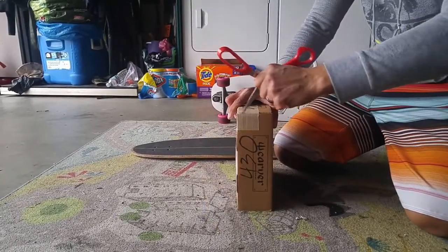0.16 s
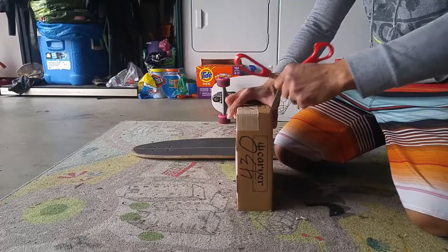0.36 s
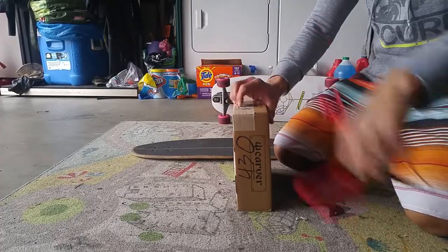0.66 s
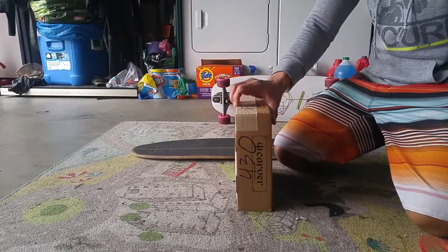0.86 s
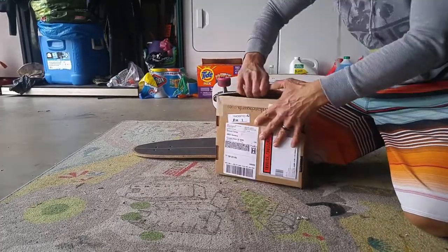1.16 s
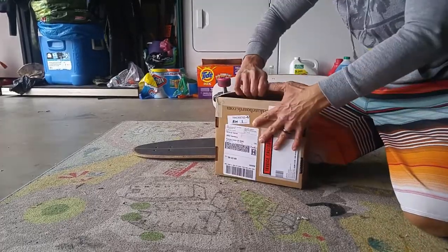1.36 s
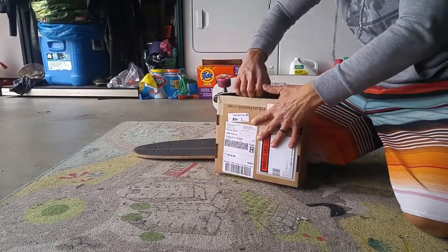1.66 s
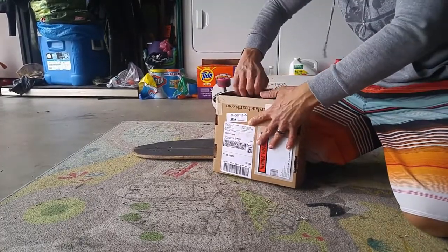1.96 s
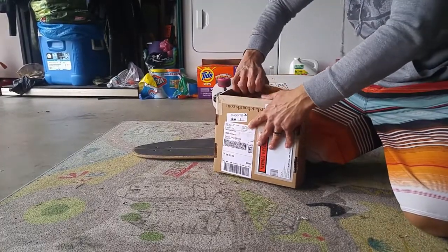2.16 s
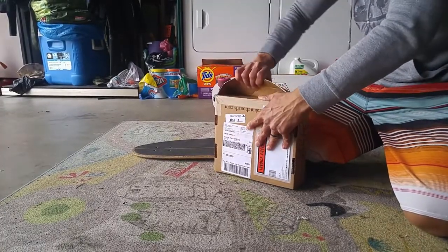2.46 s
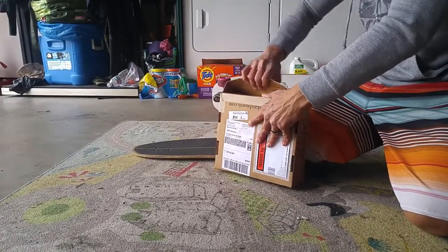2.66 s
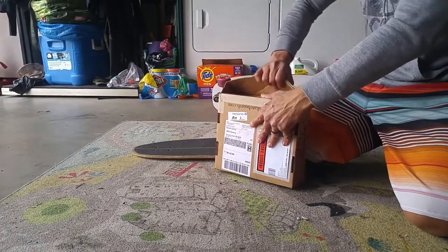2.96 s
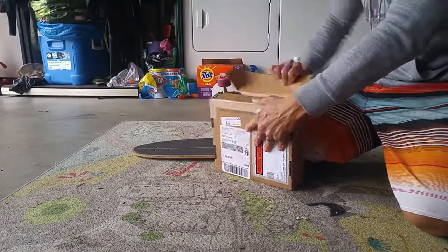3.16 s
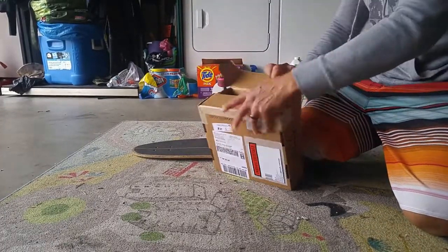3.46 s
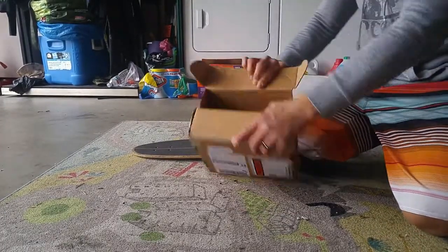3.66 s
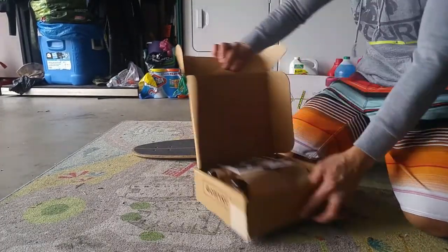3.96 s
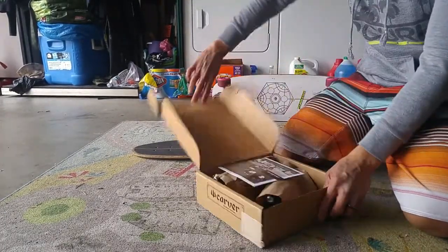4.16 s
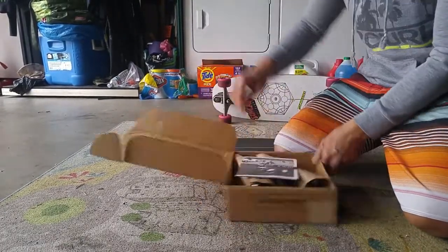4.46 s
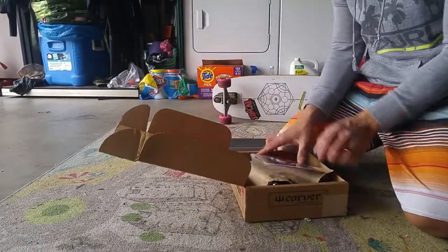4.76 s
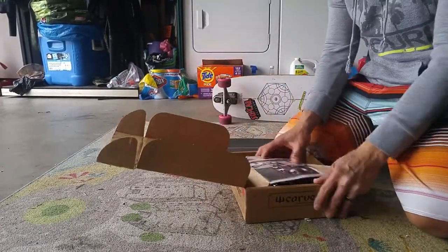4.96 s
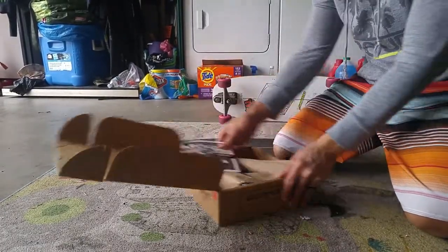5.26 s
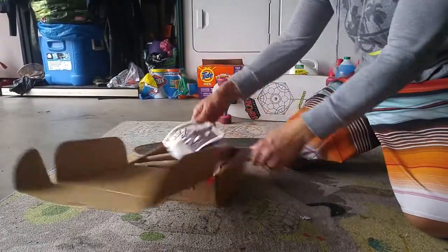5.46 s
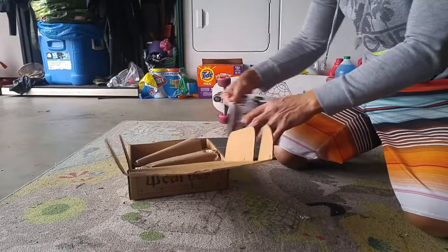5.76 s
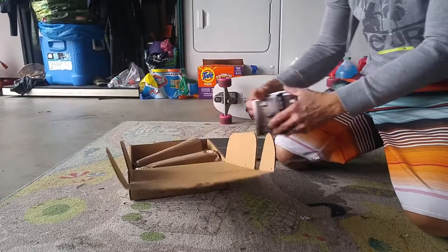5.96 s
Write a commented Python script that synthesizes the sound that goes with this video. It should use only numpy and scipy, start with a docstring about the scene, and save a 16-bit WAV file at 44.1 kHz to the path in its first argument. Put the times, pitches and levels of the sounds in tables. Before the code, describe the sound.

Scissors slit tape on a small cardboard box and clatter onto concrete, then tabs pop loose, the lid creaks open, and paper rustles.

```python
"""Opening a cardboard box

A cardboard box is opened on a rug in a garage: scissors slit the tape and clatter onto the concrete at the left,
fingers pry the tabs loose, the lid creaks open, the box slides on the rug and paper rustles.
Rubbing and knocks ring the parts of the hollow box, while its surface hisses and cracks. Bounces ring the blades.
Gliding tones are the creaks, filtered noise is the garage air. Two close microphones hear it in a short room."""
import sys
import numpy as np
from scipy import signal
from scipy.fft import rfft, irfft, next_fast_len
from scipy.io import wavfile

SR = 44100
rng = np.random.default_rng(int(sys.argv[2]) if len(sys.argv) > 2 else 0)


def master_out(mix):
    """Clip the mix to full scale and print it as 16-bit PCM to the path in sys.argv[1]."""
    frames = np.transpose(np.atleast_2d(mix))
    ceiling = np.clip(frames, -1, 1)
    pcm = np.round(ceiling * 32767).astype(np.int16)
    wavfile.write(sys.argv[1], SR, pcm)


N = 269451


def from_db(db):
    """Gain of a level in dB."""
    return 10 ** (np.asarray(db) / 20)


def rms_one(x):
    """Scale to an average strength (rms) of 1."""
    return x / np.sqrt(np.mean(x ** 2) + 1e-20)


def in_time(rows):
    """Join the rows of a table into curves over all samples, one per column after the time."""
    s, *columns = np.transpose(rows)
    return [np.interp(np.arange(N) / SR, s, column) for column in columns]


def at_hz(points, size):
    """Read a table of (f/Hz, value) at every FFT bin, along a logarithmic pitch scale."""
    hz = np.maximum(np.arange(size // 2 + 1) * SR / size, 1)
    table_hz, values = np.array(points).T
    return np.interp(np.log(hz), np.log(table_hz), values)


def colour(x, spectrum):
    """Filter to the shape of a spectrum; white noise of rms 1 keeps rms 1."""
    size = next_fast_len(N + SR // 10)
    gain = from_db(at_hz(spectrum, size))
    return irfft(rfft(x, size) * rms_one(gain), size)[..., :N]


# Colour of the garage air: f/Hz, relative level per Hz/dB
GARAGE = [(15, -50.5), (25, -16.5), (44, -4.5), (123, -1), (276, -11.5), (710, -12.5), (1090, -26.5),
          (1510, -25), (2460, -35.5), (3130, -26), (3390, -37), (8730, -30), (15800, -48)]
GARAGE_DB = -57


def garage_air():
    """The steady air of the garage is noise, strongest in the bass."""
    return from_db(GARAGE_DB) * colour(rng.standard_normal(N), GARAGE)


def ring(force, hz, t60):
    """A resonance: a unit click sets a sine of height 1 ringing, which falls 60 dB in t60 seconds."""
    r = from_db(-60 / (t60 * SR))
    w = 2 * np.pi * hz / SR
    return signal.lfilter([0, np.sin(w)], [1, -2 * r * np.cos(w), r * r], force + 1e-18)


def grains(per_s, spread_db, smooth):
    """Friction: fibres catch and let go at random, mixed with a share of smooth noise; rms near 1."""
    sizes = from_db(spread_db * np.minimum(rng.exponential(1, N), 5)) * rng.choice([-1, 1], N)
    catches = rms_one(sizes * (rng.random(N) < per_s / SR))
    share = np.clip(smooth, 0, 1)
    return np.sqrt(1 - share) * catches + np.sqrt(share) * rng.standard_normal(N)


def jolts(times, levels_db, length_s):
    """Strength of short impacts: jumps up at each time and fades by a factor e in the given length."""
    clicks = np.zeros(N)
    clicks[np.round(np.asarray(times) * SR).astype(int)] = from_db(levels_db)
    return signal.lfilter([1], [1, -np.exp(-1 / (length_s * SR))], clicks + 1e-18)


def drift(rate_hz):
    """Slow random wandering of spread 1: noise at every 40th sample through two equal low-passes."""
    r = np.exp(-80 * np.pi * rate_hz / SR)
    noise = rng.standard_normal(N // 40 + 2002)
    slow = signal.lfilter([1], [1, -2 * r, r * r], noise)[2000:]  # skip the start-up
    return np.interp(np.arange(N) / 40, np.arange(len(slow)), rms_one(slow))


def board(modes, knock_s, rub_db, knock_db, per_s, length_s, knock_gain_db, grip_db):
    """One part of the box rings when rubbed or knocked; soft contact cannot drive it far above its top mode."""
    rub = grains(per_s, spread_db=2.5, smooth=0.57)
    signs = [(-1) ** k for k in range(len(modes))]
    plain = sum(sign * from_db(db) * ring(rub, hz, t60) for sign, (hz, db, t60) in zip(signs, modes))
    rub = rub / np.std(plain)
    rattle = jolts(knock_s, knock_db + knock_gain_db, length_s)
    impact = jolts(knock_s, knock_db + knock_gain_db + 2.5, 0.00013)
    out = 0
    for sign, (hz, db, t60) in zip(signs, modes):
        # where grip_db is not zero, the moving grip frees now one mode, now another
        stroke = from_db(rub_db + grip_db * drift(24.0)) * rub
        # a sharp shared impact, and a rattle of its own for every mode
        force = stroke + impact + rattle * rng.standard_normal(N)
        out = out + sign * from_db(db) * ring(force, hz, t60)
    soft = signal.butter(2, 1.245 * modes[-1][0], fs=SR, output="sos")
    return signal.sosfilt(soft, out)


# Colour of rubbed and cracking fibres: f/Hz, relative level per Hz/dB
HISS = [(1290, -8.5), (2200, -4.5), (4290, -6.5), (4940, -6), (6380, -8), (7280, -7), (7900, -9.5),
        (9550, -2), (12300, -14.5), (14800, -19.5), (15800, -16)]
GRAIN_SPLIT_HZ = 5800  # coarse fibres sound below, fine ones above


def surface(knock_s, hiss_db, crack_db, band, per_s):
    """Paper fibres hiss under the hand and crack at each knock."""
    force = from_db(hiss_db) * grains(per_s, spread_db=5.5, smooth=0.71)
    force += jolts(knock_s, crack_db + 3.5, 0.003) * rng.standard_normal(N)
    split = signal.butter(3, GRAIN_SPLIT_HZ, band, fs=SR, output="sos")
    return signal.sosfilt(split, colour(force, HISS))


SHUDDER_DB, SHUDDER_S = -20.5, 0.031  # strength against the knock, fading time


def with_shudder(knock_s, rub_db, knock_db):
    """After a knock the board goes on rubbing briefly: add this dying shudder to the rubbing level."""
    shudder = jolts(knock_s, knock_db + SHUDDER_DB, SHUDDER_S)
    return 10 * np.log10(from_db(rub_db) ** 2 + shudder ** 2)


# Gestures of the hands, one curve each:
# t/s, relative level of pressure (sound of the board)/dB, relative level of sliding speed (hiss)/dB
STROKES = [
    [(0.0, -81, -93), (0.086, -72, -85), (0.096, -40, -54.5), (0.172, -44, -58.5), (0.194, -55, -76),
     (0.205, -53, -68)],
    [(0.205, -47, -64), (0.211, -26.5, -44), (0.229, -29.5, -41.5), (0.289, -29, -37.5),
     (0.341, -24, -32.5), (0.63, -69.5, -70.5)],
    [(0.63, -66, -71), (0.678, -31, -49), (0.728, -77, -67), (0.796, -50.5, -63), (0.828, -74, -67),
     (0.95, -58, -87)],
    [(1.15, -38, -52.5), (1.246, -49.5, -56), (1.272, -59, -76), (1.298, -39, -48.5), (1.408, -59, -71.5),
     (1.495, -43.5, -56.5)],
    [(1.495, -41, -55), (1.595, -50.5, -59), (1.621, -50, -61), (1.807, -48, -62), (1.823, -47, -78),
     (1.87, -67, -71)],
    [(1.87, -62, -79), (1.906, -41, -51.5), (2.036, -38, -55), (2.044, -32.5, -49.5), (2.186, -53.5, -69),
     (2.214, -40.5, -54)],
    [(2.214, -30, -54), (2.222, -27.5, -54), (2.238, -32, -56.5), (2.296, -36, -53.5), (2.314, -51, -69),
     (2.324, -28, -28)],
    [(2.324, -15, -36), (2.332, -8.5, -29), (2.378, -28, -37.5), (2.386, -20, -40), (2.446, -59, -56),
     (2.455, -10, -52)],
    [(2.455, -27, -31), (2.461, -24, -37), (2.475, -33, -46), (2.481, -32, -45), (2.561, -53, -66),
     (2.63, -38, -57.5)],
    [(2.63, -46, -61), (2.67, -38, -50), (2.794, -51, -60.5), (2.848, -46, -50), (2.86, -41.5, -46.5),
     (2.945, -44, -56.5)],
    [(2.945, -38, -60), (2.957, -25, -57), (2.967, -32, -55), (2.975, -21, -41), (2.997, -19.5, -39),
     (3.11, -28, -42)],
    [(3.11, -32, -46), (3.124, -21, -34.5), (3.168, -17, -32.5), (3.238, -36.5, -41.5), (3.258, -22, -36),
     (3.3, -48, -45)],
    [(3.3, -38, -52), (3.37, -32.5, -47), (3.404, -39, -55.5), (3.522, -27, -45.5), (3.542, -35, -49.5),
     (3.63, -40, -55.5)],
    [(3.63, -45.5, -62), (3.71, -28.5, -34.5), (3.756, -20, -30.5), (3.854, -24, -37), (3.868, -22, -31.5),
     (3.9, -28, -45)],
    [(3.9, -34, -39.5), (3.966, -24, -39.5), (3.998, -32.5, -41.5), (4.082, -28.5, -35.5),
     (4.094, -26, -30.5), (4.18, -31.5, -44)],
    [(4.18, -37, -45), (4.276, -41.5, -50), (4.478, -37, -43), (4.55, -33, -46.5), (4.56, -40, -44),
     (4.6, -32, -47)],
    [(4.6, -27, -41), (4.618, -22.5, -36.5), (4.7, -46, -46.5), (4.714, -36, -53), (4.728, -37, -39.5),
     (4.8, -43.5, -48)],
    [(4.8, -43, -51), (4.814, -46, -56), (4.826, -32, -45), (4.86, -42.5, -53), (4.994, -29, -41.5),
     (5.03, -47, -47)],
    [(5.03, -31.5, -40.5), (5.108, -33.5, -44), (5.144, -43.5, -44), (5.192, -31, -32.5),
     (5.284, -36, -40.5), (5.29, -24, -32)],
    [(5.29, -23.5, -37), (5.336, -26.5, -41), (5.35, -22, -28), (5.404, -36, -44), (5.63, -50.5, -47),
     (5.651, -50, -43)],
    [(5.651, -23.5, -42), (5.657, -28.5, -44), (5.671, -34, -49), (5.689, -34.5, -43.5), (5.821, -50, -59),
     (5.83, -57, -56)],
    [(5.83, -57, -61), (5.846, -59, -49), (5.852, -46, -52.5), (6.022, -51, -63), (6.04, -46, -49.5),
     (6.11, -66, -72)],
]
# Where each gesture holds the box: relative level of bottom/dB, walls/dB, flaps/dB, edges/dB
# over pressure, then level of fine over coarse fibres/dB
GRIPS = [(-26, -1, -9, -10, 8), (-34, 1.5, -4, -9, 1), (-25, -6, 2, -6.5, 2), (-8, 2.5, -4, -5.5, -0.5),
         (-2, 1, -4.5, -6, 1), (-10, -2, -8, -9.5, 0), (-12, -8, -9, -14, -3), (-15, -5.5, -17, -9, -6),
         (-10, 0.5, -8, -10, -1), (-16, 1, -2.5, -7.5, 2.5), (3, -10, -5, -9, -0.5),
         (-18, -7, -2.5, -9, -2), (-8, -7.5, -5.5, -12, -1), (-20, -1, -3.5, -5.5, -4.5),
         (-10, -0.5, -3, -6.5, -5.5), (-12, -6.5, 0, -7.5, -4.5), (-14, -2, 0, -9, -3.5),
         (-16, -5.5, -2, -17, -6.5), (-13, -3, -2.5, -9.5, -1.5), (-14, -4.5, -1.5, -3, -5),
         (-14, -4.5, -1.5, -6, -5), (-3, -5, -6, -5, -6)]
# Knocks and snaps rung through the box parts (those at 1.007 and 1.029 s come as the scissors land): # t/s,
# relative level/dB, then relative to that level: # weight/dB (bottom), hollowness/dB (walls), hardness/dB
# (edges), crack/dB (fine fibres)
KNOCKS = [(0.095, -45.5, -16, 1, -7, -13), (0.139, -42.5, -17, 0, -8, -6),
          (0.163, -34, -16, -5, -15, -11.5), (0.214, -36, -20, 10.5, -16, -14.5),
          (0.231, -25, -21, 2, -13, -19), (0.332, -25.5, -14, -4.5, 3.5, 5),
          (0.349, -25.5, -23, -4, -4, 1.5), (0.374, -30, -18, -5, -3, -7), (0.446, -23, -37, -14, -12, -11),
          (0.669, -28, -21, -16, -4.5, -42), (1.007, -30, -29, -33, -7, 0), (1.029, -32, -20, -13, -3, 10),
          (1.232, -43.5, -6, 3, 2.5, -22), (1.288, -36.5, -13, -8, -4, -7),
          (1.496, -33, -11, 2.5, 3.5, -21), (1.819, -34, -21, -7.5, -7.5, -42),
          (1.894, -41.5, -22, -9, -3, -2), (1.904, -37, -21, -3, -4, -5), (1.924, -34, -11, -7, -5, -4),
          (1.95, -39.5, -16, -2, 5, 0.5), (1.977, -35.5, -13, -2, 11, 0.5), (2.044, -37, -6, 11, 4.5, -6),
          (2.087, -46.5, -3, -5, -2, -3), (2.216, -27.5, -22, 1.5, 5.5, -40), (2.289, -54.5, 8, 3, 12.5, 3),
          (2.326, -4, -16, -8, -7, -16.5), (2.35, -25.5, -19, -0.5, 10, -16),
          (2.386, -24, -21, 0.5, 3.5, -11), (2.458, -24, -15, 6, 10, -20), (2.483, -31.5, -7, -11, 9.5, -9),
          (2.673, -38, -18, 0, -4, -2), (2.817, -42, 3.5, -1, 2, -1.5), (2.842, -34, -15, -4, 5, -4.5),
          (2.954, -32, 3.5, 5, -1.5, -31), (2.973, -25.5, 4.5, 5.5, 5.5, -20),
          (2.988, -22, -11, -1, -3, -9), (3.003, -17.5, -7, 0.5, 1.5, -25),
          (3.041, -23.5, -16, -4, 0.5, -6), (3.058, -23.5, -10, -8, 3, -11), (3.075, -30, -5, -19, 0, -16),
          (3.093, -23.5, -5, -6, -2, -12), (3.129, -19.5, -6, 3, 3.5, -11.5),
          (3.159, -11.5, -9.5, 2, -6, -13), (3.174, -20, -14, 3.5, -26, -6),
          (3.256, -21, -33, -25, -3, -19), (3.31, -30, -21, 3, -7, -25), (3.36, -25, -19.5, 4, -22, -26),
          (3.419, -39.5, -16, 8.5, -13, -21), (3.507, -27.5, -5.5, -8, 0, -21),
          (3.546, -25, -14, 7, -16, -32), (3.863, -14.5, -22, -1, -13, -34),
          (3.917, -22.5, -7, 1.5, -10, -27), (3.934, -22, -5, -7, -3, -17.5),
          (3.952, -7, -19, -6, -20, -27.5), (3.968, -10, -26, -8.5, -24, -32),
          (3.988, -30, -15, -4, -20, -6), (4.016, -21, -7.5, -2.5, -8, -23),
          (4.049, -23.5, -4.5, 1, -1, -27), (4.091, -12, -18, -7.5, -7, -23),
          (4.118, -28.5, -11, 2, 2, -15), (4.612, -19.5, -19, -6, -16, -27),
          (4.652, -22, -23, -5, -22, -12), (4.728, -37, -22, -8, 2.5, -17),
          (4.823, -20.5, -30, -29, -23, -38), (4.889, -23.5, -22, -9, -9, -23),
          (4.942, -35.5, -13, -3, -0.5, -11), (4.972, -27, -13, -7, -2, -14.5),
          (4.992, -24, -23, -4.5, -10.5, -21), (5.014, -35, -21, -8, -1.5, -12),
          (5.064, -28, -28, -8, -11, -12), (5.107, -36.5, -18, 5, -18, -11),
          (5.195, -21, -18.5, -19, -8, -7.5), (5.292, -15, -20, -3.5, 2.5, -33),
          (5.349, -21.5, -24, -27, 7, -18), (5.45, -26.5, -18, -13, -5.5, -13.5),
          (5.518, -26.5, -27, -26, -11, -28), (5.636, -37, -28, -9, -6, -5),
          (5.653, -15.5, -31, -16, -15, -27), (5.773, -44, -11, -14, 7, -5),
          (5.796, -40.5, -4, -0.5, 4.5, -4), (5.842, -41, -14, -11, -19, 4), (5.854, -38, -7, -11, -8, -17),
          (5.897, -39, -4, -6.5, 1.5, -8), (5.98, -35.5, -24, -12, -7, -27), (6.025, -47, -1, 4, 3.5, -14),
          (6.044, -47, -1, -12, 0, -14)]
# Ringing tones of the box, from its large bottom to its small edges: f/Hz, relative level/dB, t60/s
BOTTOM = [(58.5, -12.5, 0.11), (78.4, -6, 0.073), (109.4, -2, 0.11), (132, 1.5, 0.033),
          (160.7, -0.5, 0.092), (190.3, 1.5, 0.083)]
WALLS = [(205.3, -2, 0.033), (264.4, -0.5, 0.065), (295, -5.5, 0.08), (339.3, 3, 0.064), (379, 3.5, 0.074),
         (447.6, 2.5, 0.063)]
FLAPS = [(611.6, -3, 0.038), (702.7, 2, 0.028), (778.4, -2, 0.039), (855, -3, 0.037), (918, -5, 0.036),
         (998, -12, 0.073)]
EDGES = [(1097, -2, 0.022), (1200, -6.5, 0.041), (1263, -2.5, 0.02), (1552, 3, 0.011), (1824, -6.5, 0.024),
         (1950, -10.5, 0.026), (2194, -5.5, 0.012), (2450, -13, 0.023), (2774, -14.5, 0.022)]
HANDS_OFF_S = (.95, 1.15)  # the hands stop rubbing while the scissors are dropped
SNAP_HARDNESS, SNAP_DB = 0.6, -3.5  # the coarse snap lies between hardness and crack


def box():
    """The hollow box: large parts boom, small ones tick, the surface hisses and cracks."""
    rows = [row + grip for stroke, grip in zip(STROKES, GRIPS) for row in map(tuple, stroke)]
    press_db, speed_db, to_bottom, to_walls, to_flaps, to_edges, fineness = in_time(rows)
    t = np.arange(N) / SR
    rest_db = -60 * ((t > HANDS_OFF_S[0]) & (t < HANDS_OFF_S[1]))
    press_db, speed_db = press_db + rest_db, speed_db + rest_db

    knock_s, flap_db, weight, hollow, hard, crack = np.transpose(KNOCKS)
    bottom_db, wall_db = flap_db + weight + 7, flap_db + hollow + 4.5
    edge_db, crack_db = flap_db + hard + 2, flap_db + crack + 1
    snap_db = SNAP_HARDNESS * edge_db + (1 - SNAP_HARDNESS) * crack_db + SNAP_DB

    bottom_rub = with_shudder(knock_s, press_db + to_bottom - 10.5, bottom_db)
    wall_rub = with_shudder(knock_s, press_db + to_walls - 5, wall_db)
    flap_rub = with_shudder(knock_s, press_db + to_flaps - 5, flap_db - 0.5)
    edge_rub = with_shudder(knock_s, press_db + to_edges - 6.5, edge_db - 6.5)
    bottom = board(BOTTOM, knock_s, bottom_rub, bottom_db, per_s=150, length_s=0.0031,
                   knock_gain_db=-26, grip_db=3.0)
    walls = board(WALLS, knock_s, wall_rub, wall_db, per_s=300, length_s=0.0015,
                  knock_gain_db=-26, grip_db=0.0)
    flaps = board(FLAPS, knock_s, flap_rub, flap_db, per_s=500, length_s=0.0019,
                  knock_gain_db=-25.0, grip_db=3.5)
    edges = board(EDGES, knock_s, edge_rub, edge_db, per_s=900, length_s=0.0014,
                  knock_gain_db=-19.5, grip_db=4.5)
    coarse = surface(knock_s, speed_db - fineness / 2, snap_db, "low", per_s=1500)
    fine = surface(knock_s, speed_db + fineness / 2 - 1.0, crack_db, "high", per_s=3000)
    return bottom + walls + flaps + edges + coarse + fine


# Scissors skittering on concrete: t/s, relative level of the rattle/dB
SKITTER = [(0.955, -65.5), (0.979, -20), (1.009, -22), (1.017, -13.5), (1.079, -19.5), (1.15, -38.5)]
# Bounces of the scissors: t/s, relative level/dB
BOUNCES = [(0.98, -24.5), (0.99, -14.5), (1.0161, 1.5), (1.0263, -16), (1.0345, -4), (1.0386, -3.5),
           (1.0454, -9.5)]
# Ringing tones of the blades: f/Hz, width/Hz (wide ones die sooner), relative level/dB
BLADES = [(4100, 200, -14), (5300, 200, -14), (5820, 120, -11), (6680, 120, -12), (8330, 140, -4),
          (8540, 110, -3), (8670, 110, -1), (8860, 110, -4), (9690, 90, -7), (10190, 120, -2),
          (10890, 80, -7), (11380, 70, -9), (12000, 110, -13), (13100, 160, -13), (14200, 110, -14)]
# Colour of the broad clatter: f/Hz, relative level per Hz/dB
CLATTER = [(710, -46.5), (1200, -16), (1520, -22), (1620, -38), (1890, -42), (3000, -12.5), (3340, -20),
           (4020, -7.5), (4470, -13.5), (5670, -6), (7590, -13.5), (8640, -4), (14200, -32), (15800, -24)]
ROCK_S, ROCK_GAP_S = 1.0568, .0094  # the blades rock to rest: first touch, gap between touches
ROCK_DB, ROCK_LOSS_DB = -7.5, 3  # relative level of the first touch, loss per touch


def scissors():
    """Chatter and bounces drive the narrow blade tones, each unevenly, over a broad clatter."""
    t = np.arange(N) / SR
    moving = (t > SKITTER[0][0]) & (t < SKITTER[-1][0])
    rocking = [(ROCK_S + k * ROCK_GAP_S, ROCK_DB - k * ROCK_LOSS_DB) for k in range(9)]
    touch_s, touch_db = np.transpose(BOUNCES + rocking)
    contact = moving * from_db(in_time(SKITTER)[0] - 8.0)
    contact = contact + jolts(touch_s, touch_db, 0.0034) * from_db(-10.5)

    modes = [(hz, from_db(db) * np.sqrt(width), np.log(1000) / (np.pi * width)) for hz, width, db in BLADES]
    # ring the blades with plain noise to learn how loud they get
    unit = np.std(sum(gain * ring(rng.standard_normal(N), hz, t60) for hz, gain, t60 in modes))
    steel = 0
    for hz, gain, t60 in modes:
        chatter = contact * grains(1500, spread_db=5.5, smooth=0.92)
        steel = steel + gain * ring(chatter, hz, t60) / unit
    clatter = colour(contact * rng.standard_normal(N), CLATTER)
    return moving * (from_db(-2.5) * steel + from_db(-7.0) * clatter)


# Squeaks: start t/s, length t/s, start f/Hz, end f/Hz, level/dB
SQUEAKS = [(3.72, .09, 1130, 1090, -31), (4.528, .036, 1250, 1380, -37), (4.375, .06, 2500, 2520, -52),
           (4.45, .045, 2480, 2450, -52)]


def squeaks():
    """Flexing board sings briefly: short sine glides that fade in and out smoothly."""
    out = np.zeros(N)
    for s, length, start_hz, end_hz, db in SQUEAKS:
        size, i = int(length * SR), int(s * SR)
        phase = 2 * np.pi * np.cumsum(np.linspace(start_hz, end_hz, size)) / SR
        swell = signal.windows.tukey(size, .6)
        out[i:i + size] += from_db(db) * np.sqrt(2) * np.sin(phase) * swell
    return out


# Low tone of the settling lid: t/s, f/Hz, level/dB
SAG = [(4.14, 119, -46), (4.174, 123, -40), (4.21, 114, -39), (4.258, 95.5, -36.5), (4.29, 92, -49),
       (4.31, 87.6, -48)]


def sag():
    """The lid settles with a clean low tone whose pitch sags after a small rise."""
    t = np.arange(N) / SR
    hz, db = in_time(SAG)
    sounding = (t > SAG[0][0]) & (t < SAG[-1][0])
    tone = np.sqrt(2) * np.sin(2 * np.pi * np.cumsum(hz) / SR)
    return sounding * from_db(db) * tone


SWISH_S, SWISH_LENGTH_S = 4.27, .36
SWISH_HZ, SWISH_T60_S = 830, 0.038
SWISH_DB, SWISH_RISE_DB = -50.5, 9  # level at the start, rise until the end


def swish():
    """The lid sweeps back and its fold rubs: friction through one resonance, a rasp that grows."""
    size, i = int(SWISH_LENGTH_S * SR), int(SWISH_S * SR)
    friction = grains(900, spread_db=4.0, smooth=.5)
    rasp = rms_one(ring(friction, SWISH_HZ, SWISH_T60_S))[:size]
    growth = from_db(SWISH_DB + np.linspace(0, SWISH_RISE_DB, size))
    out = np.zeros(N)
    out[i:i + size] = rasp * growth * signal.windows.tukey(size, .3)
    return out


SCATTER_S = .004  # fading time of the early scatter


def scattered(x):
    """Early scatter, with fresh random echoes 25 times a second as hands and objects move."""
    hop = SR // 25
    fade = np.exp(-np.arange(SR // 20) / (SCATTER_S * SR))
    padded = np.concatenate([np.zeros(hop), x, np.zeros(2 * hop)])
    window = np.sqrt(np.hanning(2 * hop))
    out = np.zeros(N + SR)
    for i in range(0, N + hop, hop):
        echoes = rng.standard_normal(len(fade)) * fade / np.linalg.norm(fade)
        piece = signal.fftconvolve(padded[i:i + 2 * hop] * window, echoes)
        out[i:i + len(piece)] += piece
    return out[hop:hop + N]


# Likeness of left and right, which sets the scatter: f/Hz, likeness (1 the same, 0 unrelated; limited to 0..1)
LIKENESS = [(60, 0.96), (130, 0.98), (290, 0.99), (450, 0.97), (700, 0.82), (1410, 0.56), (3100, 0.3),
            (6820, 0.05), (15000, -0.01)]
ROOM_T60_S, ROOM_DB = 0.28, -22.5


def microphones(x, left_db):
    """A shared direct path, scatter of opposite sign on each side, and a diffuse tail; tilted left-right by pitch."""
    size, t = next_fast_len(N + SR), np.arange(SR // 2) / SR
    tail = rng.standard_normal((2, len(t))) * from_db(-60 * t / ROOM_T60_S) * (t > .006)
    tail = from_db(ROOM_DB) * rfft(tail / np.linalg.norm(tail[0]), size)
    direct = rfft(x, size)
    mid = direct * (1 + tail[0])
    alike = np.clip(at_hz(LIKENESS, size), 0, 1)
    side = np.sqrt((1 - alike) / (1 + alike)) * (rfft(scattered(x), size) + direct * tail[1])
    sides = np.array([[1], [-1]])  # left, right
    tilt = from_db(sides * at_hz(left_db, size) / 2)
    return irfft((mid + sides * side) * tilt, size)[:, :N]


# Left-right balance of the box and air: f/Hz, level of left over right/dB
LEFT = [(60, 0.5), (290, 0), (700, -1), (1400, -2.5), (2100, -5), (4100, -5), (6200, 0), (7500, 4),
        (9600, -2), (11000, 1), (13000, 12), (15800, 22)]
# Left-right balance of the scissors: f/Hz, level of left over right/dB
BLADES_LEFT = [(60, 0.5), (380, 2.5), (1290, 0), (4100, -4), (5500, -2), (6900, 7), (8300, 10), (11700, 11),
               (13000, 16), (14500, 29), (15800, 33)]


def scene():
    """Box and garage air in front, scissors off to the left."""
    front = garage_air() + box() + squeaks() + sag() + swish()
    return microphones(front, LEFT) + microphones(scissors(), BLADES_LEFT)


CUTOFF_HZ = 15700


def record(dry):
    """The deepest bass is lost, the highest peaks clip, then the top is cut."""
    thin = signal.sosfilt(signal.butter(3, 48, "high", fs=SR, output="sos"), dry)
    clipped = np.clip(thin, -.9, .9)
    return signal.sosfilt(signal.ellip(12, .5, 90, CUTOFF_HZ, fs=SR, output="sos"), clipped)


dry = scene()
out = record(dry)
master_out(out)
```